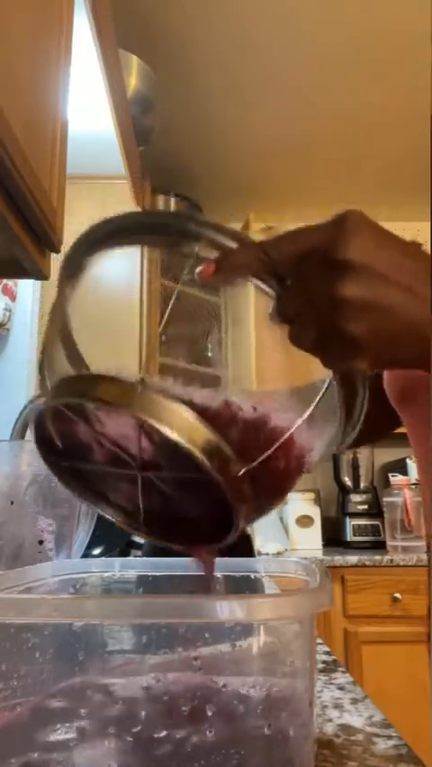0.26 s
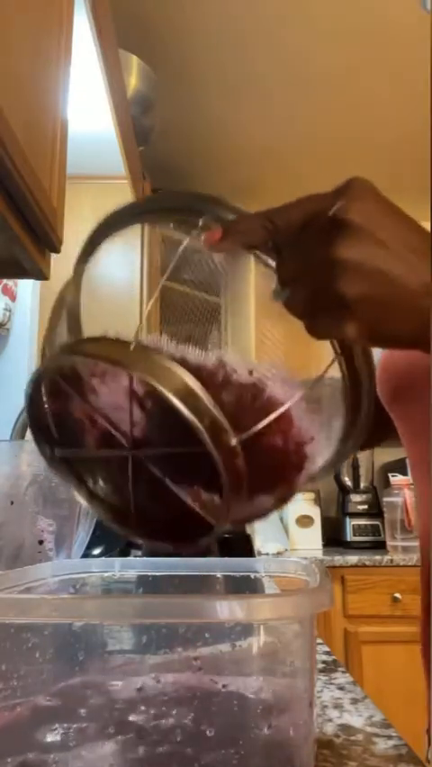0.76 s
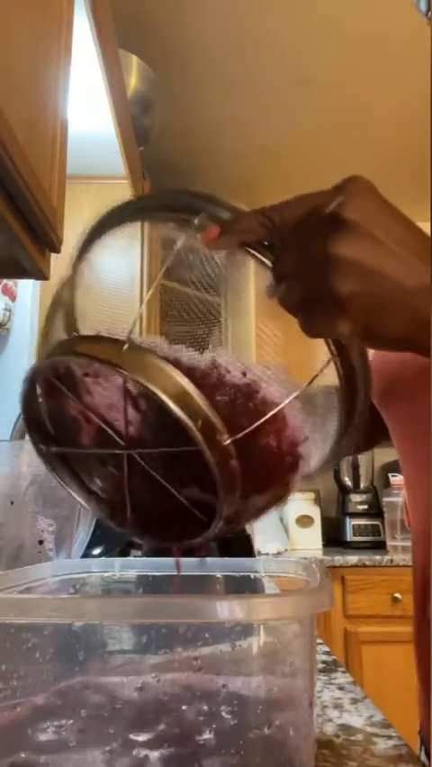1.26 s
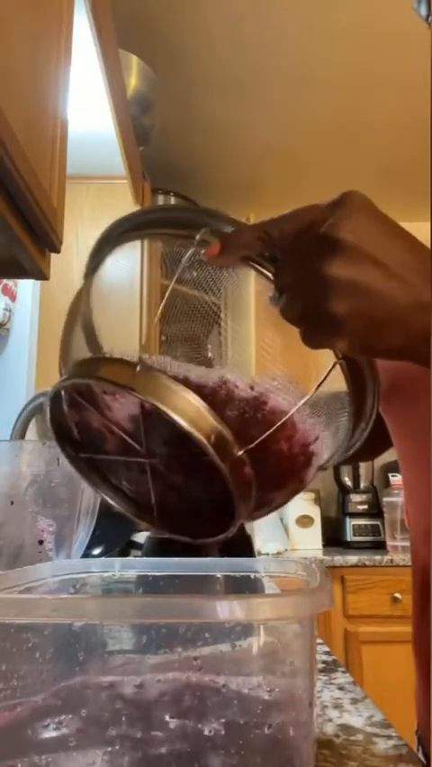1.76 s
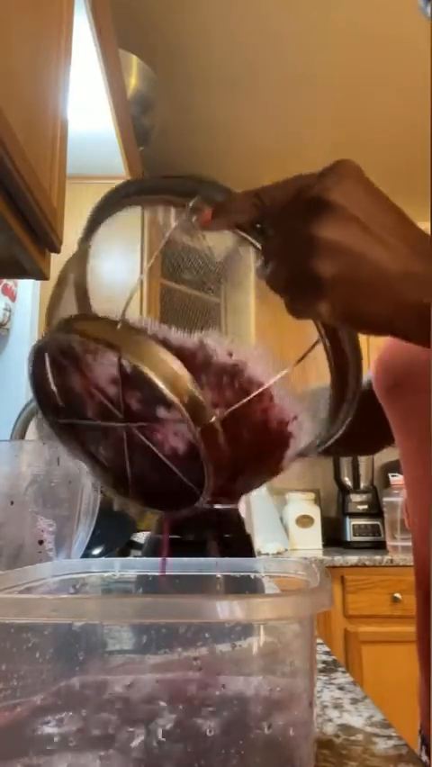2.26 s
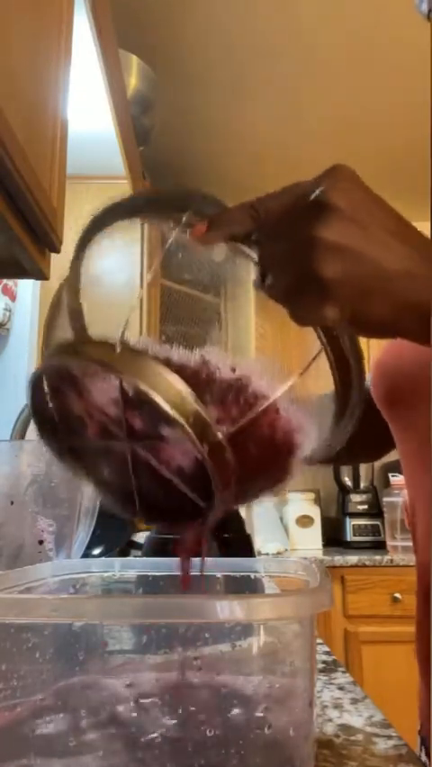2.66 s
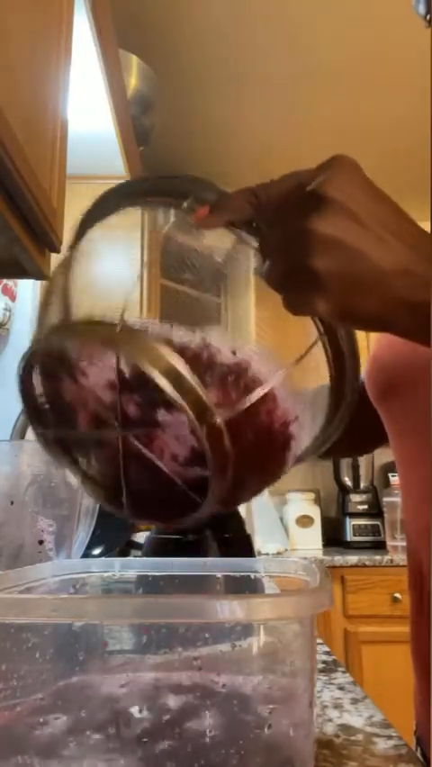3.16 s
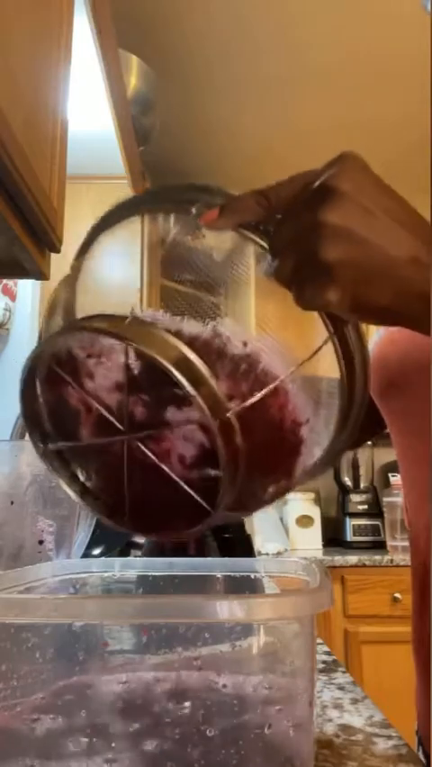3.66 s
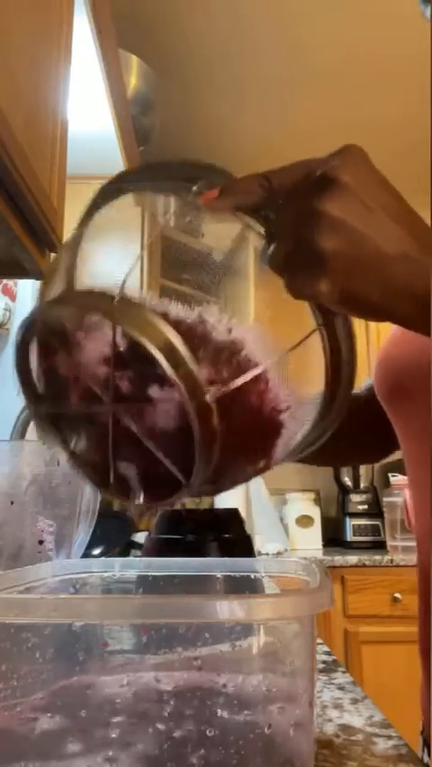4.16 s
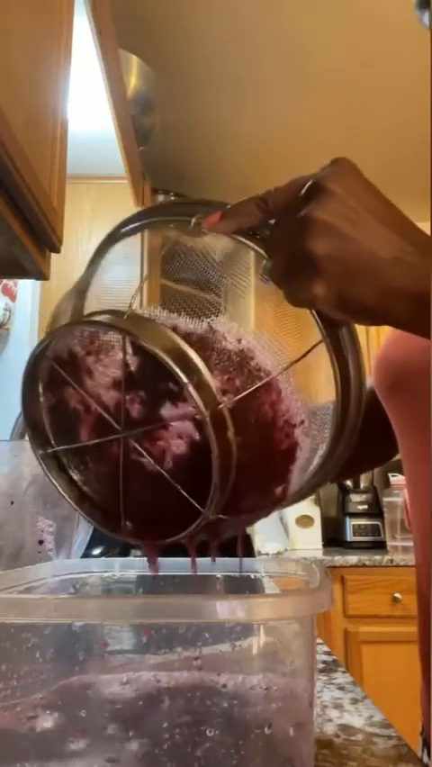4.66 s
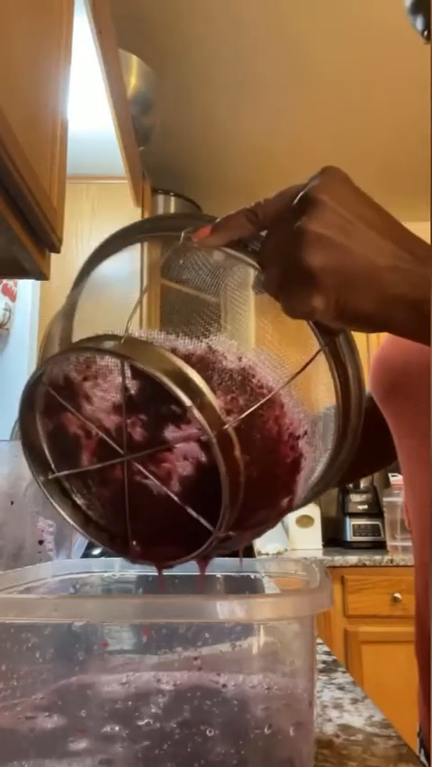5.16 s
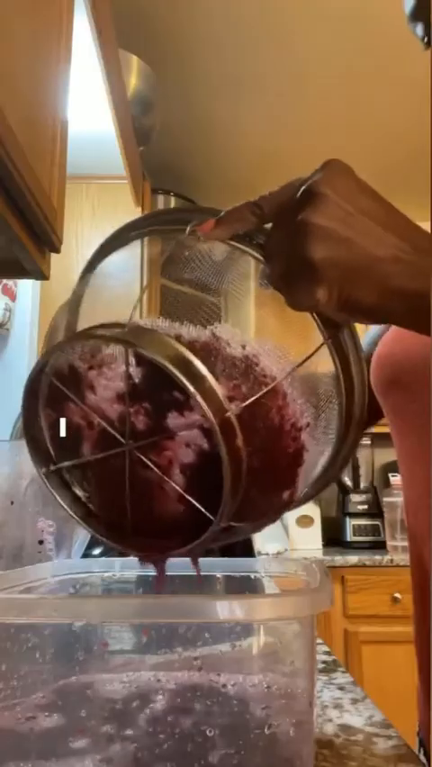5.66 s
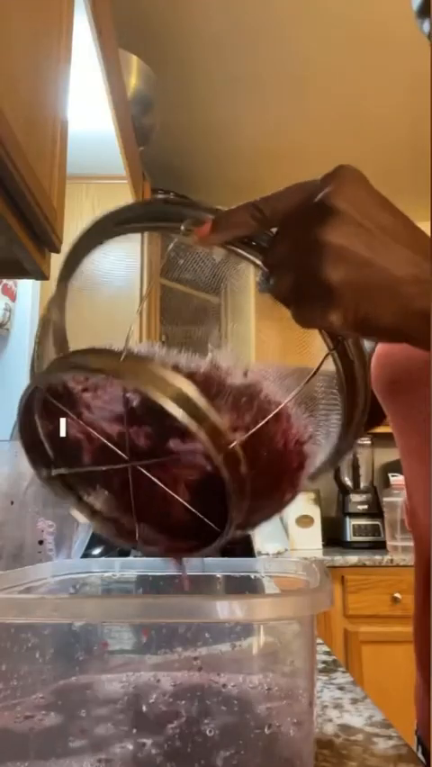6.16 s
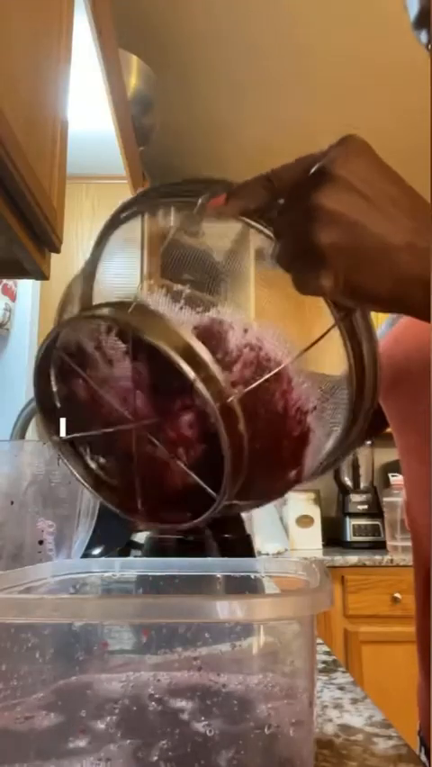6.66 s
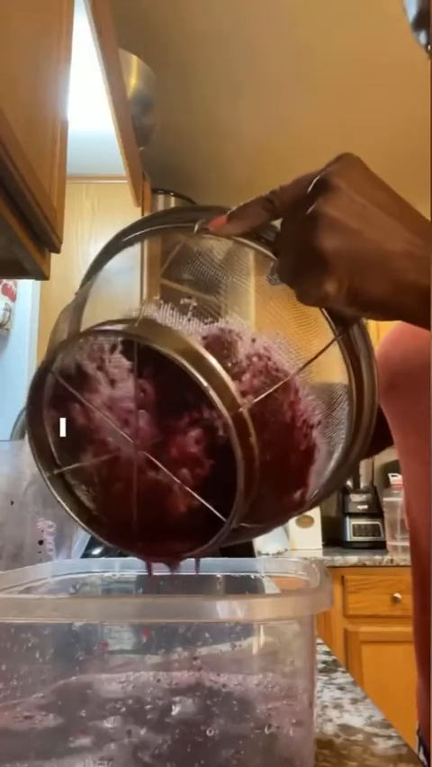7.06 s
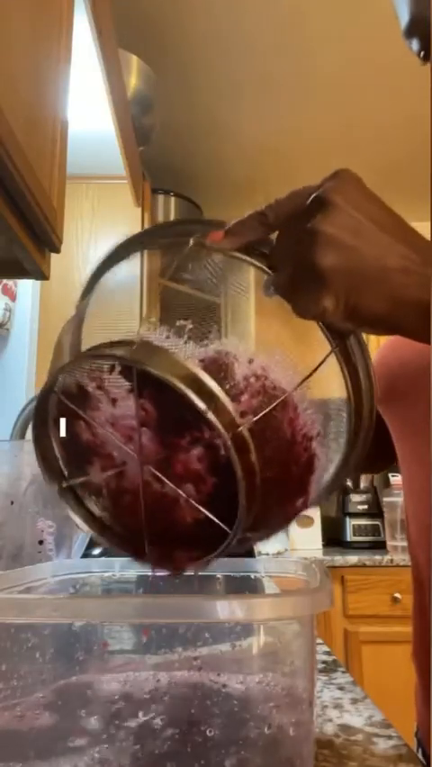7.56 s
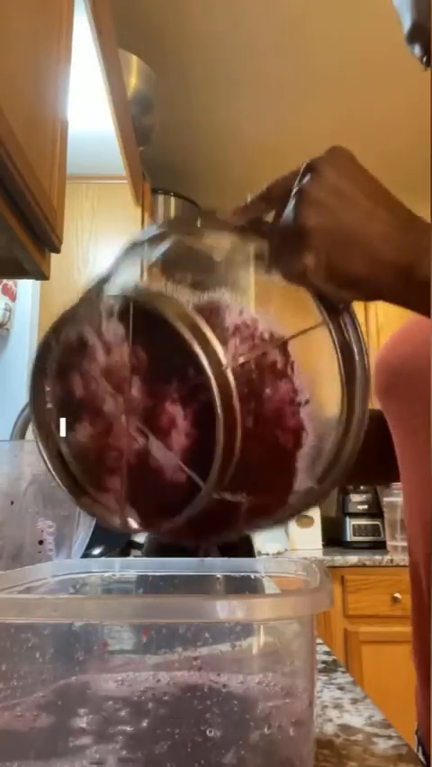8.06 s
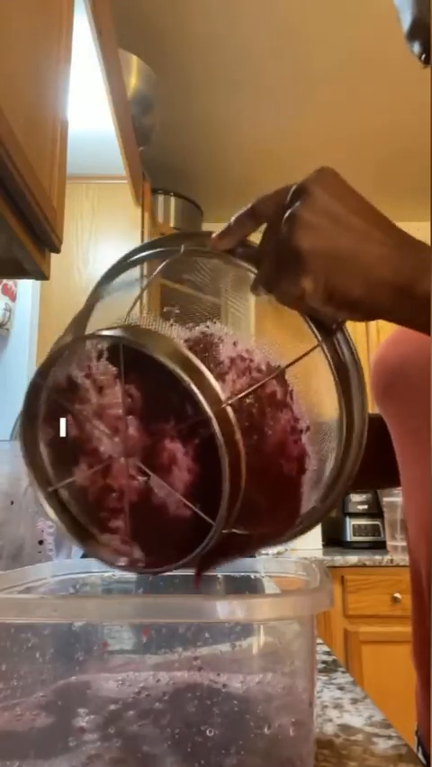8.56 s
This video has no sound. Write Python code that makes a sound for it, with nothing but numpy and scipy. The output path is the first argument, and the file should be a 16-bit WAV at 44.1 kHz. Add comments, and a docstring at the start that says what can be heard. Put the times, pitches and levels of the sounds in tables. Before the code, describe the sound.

From the start, dense wet squeezing of fruit pulp through a wire strainer, heard close: sticky crackle, tiny bubbles, bright spray and pitched pops in quick clusters until about 1.7 s. Activity thins, then bursts again around 2.0-2.7 s, with dull juice thuds in the plastic tub. After a quieter gap, a strong plop and thud come at 3.3 s, followed by sharp, bright snaps near 3.8 s and busy popping from 4.1 to 5.3 s, loudest near 4.9 s. Sound drops out completely at 5.3-5.6 s, returns muffled, and regains its treble around 5.8 s. Juicy pops and thuds crowd 5.9-6.4 s, thin out, then cluster at 7.0-7.3 s. A hissy, spraying squeeze stands out at 7.8-8.0 s; scattered squelches and pops continue to 8.7 s. Throughout, low arm rumble, faint hum, still air and slight kitchen echo.

```python
"""Pressing fruit pulp through a strainer

Hands press fruit pulp through a wire strainer over a plastic tub in a kitchen. Squeezes swell as
crackling noise and small bubbles; air pockets pop as bending notes with plops and spray; pitched blips
snap, ticks click and juice thuds on the tub floor. The tub's resonances colour squelch, pops and blips,
and the kitchen echoes it all, over arm rumble, room air and a hum. One dropout returns dull at first."""
import sys
import numpy as np
from scipy import signal
from scipy.fft import rfft, irfft, next_fast_len
from scipy.io import wavfile

SR = 44100
rng = np.random.default_rng(int(sys.argv[2]) if len(sys.argv) > 2 else 0)


def generate_wav(sig):
    """Save sig (samples, or channels by samples) to the path in sys.argv[1] as 16-bit PCM at SR."""
    pcm = np.round(np.clip(np.atleast_2d(sig).T, -1, 1) * 32767).astype(np.int16)
    wavfile.write(sys.argv[1], SR, pcm)


N = 388521  # length in samples

# Spectra, each shaped before its layer is levelled: pitch_hz, density_db (relative, per Hz)
# the room's still air
AIR_SPECTRUM = [(88, -31.5), (150, -9.5), (205, 1), (941, -4), (1560, -8), (5570, -7), (11900, -16.5),
                (14800, -3), (16000, -21)]
# low rumble of the working arms
RUMBLE_SPECTRUM = [(15, -29.5), (25, -23), (52, 5), (102, 8.5), (134, 3.5), (178, -14), (270, -18.5),
                   (350, -40), (590, -120)]
# wet body of the squeezed pulp
SQUELCH_SPECTRUM = [(88, -59.5), (150, -4), (440, 2), (640, 0), (1550, -8), (5000, -10), (6500, -39.5),
                    (11000, -120)]
# hiss of juice through the mesh
HISS_SPECTRUM = [(1650, -16.5), (2800, -8), (7700, -10), (8890, -22.5), (10000, -7.5), (13000, -42),
                 (22000, -120)]
# thin top of the hiss
MIST_SPECTRUM = [(4710, -36), (8000, 3), (12100, -13.5), (14100, -5), (16500, -0.5)]
# resonances of the air in the tub: pitch_hz, width_hz, level_db (relative; each use adds a boost)
TUB_RESONANCES = [(651.5, 43, 16.5), (1123, 57, 8.5), (1568, 61, 16.5), (2040, 280, 11.5), (2810, 77, 16),
                  (3620, 310, 6.5), (5490, 1570, 8.5)]
# squeezes of the pulp: start_s, hold_s, squelch_db, hiss_db, mist_db, rumble_db
SQUEEZES = [(0.085, 0.16, -50, -44.5, -53, -47.5), (0.344, 0.029, -58, -51.5, -54, -58),
            (0.475, 0.072, -53.5, -74, -63, -63), (0.72, 0.026, -64, -80, -69, -54.5),
            (0.923, 0.072, -48.5, -48, -57, -50.5), (1.077, 0.19, -58, -58, -72, -58),
            (1.318, 0.12, -55.5, -56.5, -66, -57), (1.478, 0.014, -46, -49, -73, -51),
            (1.603, 0.048, -53.5, -47, -63, -78), (1.995, 0.13, -63, -51, -57, -58.5),
            (2.29, 0.14, -57, -57, -56, -49), (2.459, 0.22, -50, -50, -59, -52.5),
            (2.88, 0.0084, -73, -44, -53.5, -64), (3.323, 0.06, -52, -53.5, -76, -55.5),
            (3.764, 0.18, -53, -48.5, -64, -49), (4.11, 0.046, -55, -45.5, -56.5, -66),
            (4.26, 0.03, -55, -76, -74, -65), (4.456, 0.048, -57, -56, -71, -51.5),
            (4.61, 0.21, -52, -69, -58.5, -54), (4.923, 0.029, -48, -46.5, -70, -54),
            (5.037, 0.049, -54.5, -76, -64, -52.5), (5.175, 0.078, -63.5, -75, -80.5, -55.5),
            (5.583, 0.37, -64.5, -82, -80, -59.5), (5.774, 0.067, -52, -71, -58, -67),
            (5.967, 0.025, -52.5, -66, -57.5, -65), (6.06, 0.033, -50.5, -47, -61, -50.5),
            (6.253, 0.031, -58.5, -48, -59, -52.5), (6.376, 0.12, -56, -61, -60.5, -69),
            (6.98, 0.033, -52.5, -70, -52, -52.5), (7.098, 0.21, -57, -81, -74, -60),
            (7.652, 0.039, -58.5, -84, -78, -59.5), (7.78, 0.04, -48.5, -38.5, -52, -61),
            (7.92, 0.027, -57.5, -45, -49, -75), (8.262, 0.27, -58, -78, -62.5, -55),
            (8.695, 0.2, -58.5, -58, -59, -57.5)]
# how fast a squeeze ebbs, one value each: squelch, hiss, mist, rumble (dB per s)
RELEASE_DB_PER_S = [96, 160, 120, 58]
# what seeps on between squeezes, one value each: squelch, hiss, mist, rumble (dB)
REST_DB = [-72.5, -67, -77.5, -63.5]
# lumps of juice landing on the tub floor: start_s, level_db
THUDS = [(0.705, -49.5), (0.748, -49), (0.77, -45), (0.923, -43), (1.458, -41.5), (1.509, -39),
         (2.346, -42), (2.421, -40.5), (2.498, -45), (3.336, -36), (5.996, -43.5), (6.109, -38.5),
         (6.303, -40), (7.006, -43.5), (7.168, -52), (7.795, -45), (8.713, -42.5)]
# short pitched blips with a snap: start_s, level_db, pitch_hz
BLIPS = [(0.074, -36, 8100), (0.213, -33, 2810), (0.258, -34, 2300), (0.38, -44, 5950), (0.6848, -45, 5840),
         (0.825, -44, 5460), (0.8618, -38, 3780), (0.885, -44.5, 1980), (0.905, -31.5, 4800),
         (1.089, -37, 3440), (1.133, -33, 3910), (1.155, -35.5, 3880), (1.209, -36.5, 810),
         (1.3897, -43, 2040), (1.4875, -40.5, 5550), (1.5983, -29, 3580), (1.644, -32, 2400),
         (1.7414, -44, 2110), (1.8118, -44.5, 2860), (1.9628, -36.5, 3270), (2.387, -36.5, 1180),
         (2.55, -33, 2830), (2.57, -35, 4050), (2.609, -36, 3210), (2.899, -36.5, 1746), (3.157, -51, 4000),
         (3.189, -49, 4950), (3.271, -42, 9700), (3.2962, -32, 5080), (3.422, -32, 5030),
         (3.5164, -44, 5840), (3.5409, -45, 2200), (3.6248, -46, 2530), (3.6573, -45, 1510),
         (3.797, -25, 3240), (3.8152, -23, 4160), (3.863, -21, 5530), (4.246, -37.5, 3400),
         (4.3305, -38, 3080), (4.492, -27, 3470), (4.5762, -32.5, 5970), (4.61, -36.5, 2200),
         (4.67, -33, 1497), (4.703, -34, 1180), (4.9352, -29.5, 2890), (4.945, -24, 3500),
         (5.094, -34, 1260), (5.2575, -37, 5870), (5.682, -31, 3300), (5.9473, -36, 1960),
         (5.975, -38.5, 2920), (6.053, -39, 2040), (6.2507, -38.5, 4280), (6.3969, -41, 765),
         (6.742, -49.5, 2480), (6.768, -47, 5300), (6.8089, -49, 1590), (6.9077, -38, 2630),
         (6.94, -44, 3750), (6.987, -44, 3600), (7.003, -40, 3720), (7.022, -39, 3830), (7.1091, -39, 2100),
         (7.149, -46, 5400), (7.407, -40.5, 2800), (7.4637, -30, 2280), (7.831, -29.5, 6260),
         (7.936, -33, 4110), (8.111, -51, 5030), (8.205, -36.5, 3430), (8.38, -45, 2350),
         (8.4276, -37, 1156), (8.556, -41, 2540)]
# air pockets with plop and spray:
# start_s, bubble_db, pitch_hz, plop_db, spray_db, roughness (0 clean to 1 torn)
POPS = [(0.1079, -31.5, 1140, -35.5, -45, 0), (0.1411, -22.5, 3620, -34, -52, 0.3),
        (0.166, -28, 624, -33, -48, 0.14), (0.196, -26.5, 3200, -39, -35, 0.56),
        (0.28, -33, 2900, -65, -29, 0.08), (0.3289, -20, 3406, -34, -35.5, 0.43),
        (0.4366, -39.5, 3700, -64, -36, 0.8), (0.5036, -27.5, 3530, -39, -30.5, 0.56),
        (0.532, -26, 2160, -35.5, -34, 0.42), (0.6185, -31.5, 4830, -47, -33, 0.42),
        (0.9193, -20, 1610, -29.5, -49, 0), (0.9767, -33, 5600, -44, -33, 0),
        (1.0009, -31.5, 1484, -30, -43, 0), (1.0261, -37.5, 653, -32, -58, 0.1),
        (1.077, -22.5, 2300, -44, -51, 0.39), (1.1184, -26.5, 3160, -63, -36.5, 0.3),
        (1.191, -30.5, 2920, -36.5, -30, 0.05), (1.305, -27.5, 2026, -40, -35, 0.54),
        (1.509, -30, 662, -31.5, -43, 0.05), (1.537, -28.5, 1200, -36.5, -50, 0.57),
        (1.558, -22, 2216, -50, -41, 0.6), (1.6132, -29.5, 1570, -67, -25, 0.47),
        (1.628, -28.5, 3850, -55, -37, 0.73), (1.6744, -23.5, 2634, -37.5, -49, 0.43),
        (2.0254, -37, 620, -36, -26, 0.2), (2.1238, -25.5, 2615, -39, -48, 0.92),
        (2.343, -30, 1190, -29.5, -43, 0.1), (2.4216, -25, 665, -28.5, -58, 0.26),
        (2.4878, -25.5, 4780, -42, -29, 0.64), (2.523, -36, 650, -40, -27.5, 0.4),
        (2.5404, -24, 2810, -42.5, -35, 0.42), (2.5656, -31, 610, -34, -31.5, 0),
        (2.6634, -26, 2280, -37.5, -40.5, 0.46), (2.872, -39, 2394, -43.5, -33, 0),
        (3.335, -22, 1394, -24, -44, 0), (3.3724, -27, 1690, -46, -45, 0.6),
        (3.42, -28, 2900, -47, -44, 0.4), (3.764, -32, 924, -44, -48, 0.4),
        (3.7904, -28, 1310, -30, -35.5, 0), (3.842, -31, 702, -24.5, -56, 0.1),
        (3.8618, -44, 624, -25.5, -29, 0.1), (3.982, -34, 2040, -42.5, -46, 0.4),
        (4.0837, -21, 2040, -46, -39, 0.2), (4.1338, -24, 2390, -56, -38, 0.6),
        (4.2935, -32.5, 2044, -40.5, -45, 0.5), (4.484, -35, 4600, -55, -45, 0.3),
        (4.4906, -32.5, 594, -34.5, -30.5, 0.4), (4.5417, -25, 2310, -42, -54, 0.42),
        (4.6405, -29.5, 1190, -41, -32.5, 0.36), (4.7649, -29, 1950, -40, -35.5, 0.54),
        (4.806, -36.5, 687, -41, -31, 0), (4.9447, -17.5, 2040, -51, -33, 0.45),
        (5.0444, -23, 1326, -30.5, -42, 0.07), (5.1983, -48, 677, -33.5, -75, 0.15),
        (5.2207, -32, 1770, -43, -62, 0.4), (5.263, -39, 2750, -46.5, -34, 0.08),
        (5.609, -30.5, 1070, -34, -39, 0.73), (5.9768, -21, 1580, -40.5, -45, 0.32),
        (6.063, -28.5, 3980, -63, -50, 0.4), (6.108, -23.5, 980, -31, -67, 0.11),
        (6.1492, -19.5, 2200, -39, -60, 0.25), (6.2872, -19.5, 3656, -38, -29, 0.44),
        (6.5662, -39, 1572, -46, -33.5, 0.75), (7.002, -24.5, 10700, -60, -55.5, 0.9),
        (7.003, -30.5, 578, -36, -52, 0.4), (7.0702, -47, 596, -28.5, -43, 0),
        (7.1673, -21.5, 1073, -32.5, -47, 0.16), (7.197, -28.5, 3125, -51, -41, 0.44),
        (7.2332, -34, 1316, -47, -30.5, 0.6), (7.236, -33, 13650, -53, -60, 1),
        (7.2678, -33, 1926, -40.5, -43, 0.5), (7.641, -22.5, 1584, -37.5, -45, 0.21),
        (7.6788, -32.5, 3080, -41, -35, 0.05), (7.7956, -29.5, 1900, -38.5, -58, 0.9),
        (7.9329, -22, 5340, -45, -23.5, 0.75), (7.968, -31.5, 7650, -41.5, -29, 0.85),
        (8.2164, -23, 3017, -55, -40, 0.19), (8.274, -38.5, 677, -57.5, -30.5, 0.03),
        (8.2894, -30, 4570, -45, -37, 0.1), (8.497, -43, 574, -47, -44.5, 0.9),
        (8.6672, -23, 2313, -43, -66, 0.17)]

AIR_DB, HUM_HZ, HUM_DB = -59.5, 124.4, -63.5
KITCHEN_T60_S, KITCHEN_DB, WALL_CUT_HZ = 0.3, -25, 18000
SILENT_FROM_S, SILENT_TO_S, TREBLE_BACK_S = 5.314, 5.574, 5.805
DULL_HZ, CUTOFF_HZ = 9100, 15950  # stopband edges
ATTACK_S = 0.023
# the thud's end pitch and sag time, and the plop's, are varied per event
THUD_START_HZ, THUD_END_HZ, THUD_SAG_S, THUD_DIES_S = 650, 109, 0.0086, 0.019
PLOP_START_HZ, PLOP_END_HZ, PLOP_SAG_S, PLOP_DIES_S = 2300, 396.5, 0.00261, 0.0042
PLOP_GRIT = 0.81  # gain of the plop's noise
TICKS_PER_S, TICK_DB, TICK_LOW_HZ = 70, -57, 1000  # level of the smallest tick before filtering


def from_db(db):
    """Turn decibels into an amplitude factor."""
    return 10 ** (np.asarray(db) / 20)


def rms_one(x):
    """Scale a signal to an rms of 1."""
    return x / np.sqrt(np.mean(x ** 2) + 1e-20)


def band(x, low_hz, high_hz):
    """Keep the band between two frequencies."""
    return signal.sosfilt(signal.butter(2, [low_hz, high_hz], "band", fs=SR, output="sos"), x)


def drift(rate_hz):
    """Slow random wander of rms 1: noise through a double one-pole low-pass."""
    r = np.exp(-40 * np.pi * rate_hz / SR)  # runs at a twentieth of the sample rate
    noise = rng.standard_normal(N // 20 + 2002)
    slow = signal.lfilter([1], [1, -2 * r, r * r], noise)[2000:]
    return np.interp(np.arange(N) / 20, np.arange(len(slow)), rms_one(slow))


def coloured(source, spectrum, patchy_db):
    """Shape two sources, in alternate bands of about half an octave that flicker apart; rms 1."""
    hz, db = np.transpose(spectrum)
    bands = round(2 * np.log2(hz[-1] / hz[0]))
    edges = np.geomspace(hz[0], hz[-1], bands + 1)
    out = 0
    for k, (low, high) in enumerate(zip(edges, edges[1:])):
        level_db = np.interp(np.log(low * high) / 2, np.log(hz), db)
        flicker = from_db(level_db + patchy_db * drift(11.6))
        out = out + flicker * band(source[k % 2], low, high)
    return rms_one(out)


def crackle(per_s, spread_db, clump_db, smear_s):
    """Two noises made of short bursts in the same clumps: sharp start, quick death."""
    sizes = from_db(spread_db * np.minimum(rng.exponential(1, N), 3))
    born = rng.random(N) < per_s * from_db(clump_db * drift(14)) / SR
    floor = 0.0058  # keeps a faint noise between bursts
    bursts = signal.lfilter([1], [1, -np.exp(-1 / (smear_s * SR))], sizes * born + floor)
    return bursts * rng.standard_normal((2, N))


def room_air():
    """The room's still air: shaped noise whose bands flicker slightly."""
    return from_db(AIR_DB) * coloured(rng.standard_normal((2, N)), AIR_SPECTRUM, patchy_db=2.5)


def hum():
    """A steady low sine whose level wavers a little."""
    t = np.arange(N) / SR
    return from_db(HUM_DB + 0.54 * drift(6.1)) * np.sin(2 * np.pi * HUM_HZ * t)


def kitchen(x):
    """Sixteen feedback delays, duller on every round, summed in the frequency domain."""
    size = next_fast_len(N + SR // 2)
    hz = np.arange(size // 2 + 1) * SR / size
    dull = 1 / (1 + 1j * hz / WALL_CUT_HZ)
    tail = 0
    for k, lag_s in enumerate(rng.uniform(0.012, 0.037, size=16)):
        loss = from_db(-60 * lag_s / KITCHEN_T60_S)
        loop = loss * np.exp(-2j * np.pi * hz * lag_s) * dull
        tail = tail + (-1) ** k * loop / (1 - loop)
    return irfft(rfft(x, size) * tail, size)[:N]


def tub(x, boost_db):
    """The tub's air rings at its own resonances when excited; the overall level is kept."""
    out = x.copy()
    for hz, width_hz, db in TUB_RESONANCES:
        r = np.exp(-np.pi * width_hz / SR)
        poles = [1, -2 * r * np.cos(2 * np.pi * hz / SR), r * r]
        peak = signal.lfilter([(1 - r * r) / 2, 0, (r * r - 1) / 2], poles, x)
        out += from_db(boost_db + db) * peak
    return rms_one(out) * np.std(x)


def effort():
    """Gains of squelch, hiss, mist and rumble: squeezes swell, hold and ebb over a resting level."""
    t = np.arange(0, N + 64, 64) / SR
    power = from_db(REST_DB)[:, None] ** 2 * np.ones(len(t))
    for start_s, hold_s, *levels_db in SQUEEZES:
        swell = np.clip((t - start_s) / ATTACK_S, 0, 1) ** 2
        ebb_db = -np.outer(RELEASE_DB_PER_S, np.maximum(t - start_s - hold_s, 0))
        gain = swell * from_db(np.array(levels_db)[:, None] + ebb_db)
        power += gain ** 2
    return [np.interp(np.arange(N) / SR, t, gain) for gain in np.sqrt(power)]


def arm_rumble(working):
    """Low noise of the arms that rises with each squeeze."""
    return working * coloured(rng.standard_normal((2, N)), RUMBLE_SPECTRUM, patchy_db=2.0)


def thuds():
    """The soft plastic floor gives a dull note that slides down as it dies."""
    t = np.arange(round(0.1 * SR)) / SR
    out = np.zeros(N + len(t))
    varied = rng.uniform(0.667, 1.335, (len(THUDS), 2))
    for (start_s, db), (stretch, tuning) in zip(THUDS, varied):
        end_hz = THUD_END_HZ * tuning
        sag = np.exp(-t / (THUD_SAG_S * stretch))
        hz = end_hz + (THUD_START_HZ - THUD_END_HZ) * sag
        note = np.exp(-t / THUD_DIES_S) * np.sin(2 * np.pi * np.cumsum(hz) / SR)
        first = round(start_s * SR)
        out[first:first + len(t)] += from_db(db) * note
    return out[:N]


def ticks():
    """Lone droplets snap off the mesh: sparse, sharp clicks of uneven size."""
    sizes = from_db(TICK_DB + 5.6 * np.minimum(rng.exponential(1, N), 3))
    snaps = (rng.random(N) < TICKS_PER_S / SR) * sizes
    decays = signal.lfilter([1], [1, -np.exp(-1 / (0.00035 * SR))], snaps)
    return band(decays * rng.standard_normal(N), TICK_LOW_HZ, 11000)


def mesh_hiss(hissing, misting):
    """Juice forced through the mesh: fine crackle as a broad hiss plus a thin top."""
    fizz = crackle(900, spread_db=6.5, clump_db=4, smear_s=0.0012)
    hiss = hissing * coloured(fizz, HISS_SPECTRUM, patchy_db=2.5)
    return hiss + misting * coloured(fizz, MIST_SPECTRUM, patchy_db=1.5)


def blips(dies_s=0.0045, swell_s=0.0005, snap_db=-43, width=1.2, rasp_db=-6):
    """Each blip: a short pitched note frayed by a wet rasp, plus a broad snap alike for all blips."""
    t = np.arange(round(0.03 * SR)) / SR
    grit = rng.standard_normal(N + len(t))
    out = np.zeros(N + len(t))
    for (start_s, db, hz), (long, bend) in zip(BLIPS, rng.standard_normal((len(BLIPS), 2))):
        at = slice(round(start_s * SR), round(start_s * SR) + len(t))
        rasp = rms_one(band(grit[at], hz / width, hz * width))
        note = np.sin(2 * np.pi * hz * t * (1 + 2 * bend * t)) + from_db(rasp_db) * rasp
        body = (1 - np.exp(-t / swell_s)) * np.exp(-t / dies_s / from_db(1.5 * long))
        blip = note * body
        snap = grit[at] * np.exp(-t / swell_s)
        out[at] += from_db(db) * blip / np.abs(blip).max() + from_db(snap_db) * snap
    return out[:N]


def small_bubbles(per_s, cycles, spread_db):
    """Little pockets burst at random in 22 pitches; each note swells and dies over some cycles."""
    sizes = from_db(spread_db * np.minimum(rng.exponential(1, N), 4)) * rng.choice([-1, 1], N)
    born = rng.random(N) < per_s * from_db(5 * drift(12)) / SR
    dealt = rng.integers(0, 22, N)
    out = 0
    for k, hz in enumerate(np.geomspace(1200, 7000, 22)):
        r, w = from_db(-60 * hz / cycles / SR), 2 * np.pi * hz / SR
        ring = [0, np.sin(w), 0, 1, -2 * r * np.cos(w), r * r]
        bursts = sizes * born * (dealt == k) + 1e-18
        out = out + w * signal.sosfilt([ring, ring], bursts)  # two resonators make it swell
    return rms_one(out)


def pulp_squelch(squelching):
    """Squeezed pulp: coarse wet crackle and small bubbles under the same pressure."""
    smacks = crackle(450, spread_db=6.5, clump_db=2.5, smear_s=0.003)
    smacks = coloured(smacks, SQUELCH_SPECTRUM, patchy_db=2.5)
    plinks = small_bubbles(450, cycles=26.7, spread_db=2.5)
    return squelching * (smacks + plinks)


def pops(rise_s=0.0023, swell_s=0.0017, clean_s=0.0051, torn_s=0.0057, glide=0.011,
         echo_s=0.0085, echo_db=-17):
    """Each air pocket: a bending, ringing note, a plop that slides down and a tinted bright spray."""
    t = np.arange(round(0.06 * SR)) / SR
    plop, spray, grit = rng.standard_normal((3, N + len(t)))
    plop = rms_one(band(plop, 170, 1500))
    tints = np.array([band(spray, 2400, 5500), band(spray, 5340, 13000),
                      from_db(1.5) * band(spray, 12600, 15000)])
    out = np.zeros(N + len(t))
    chances = rng.standard_normal((len(POPS), 7))
    for (start_s, db, hz, plop_db, spray_db, rough), chance in zip(POPS, chances):
        at = slice(round(start_s * SR), round(start_s * SR) + len(t))
        slow, long = from_db(2.5 * chance[0]), from_db(1.5 * chance[1])
        bend, wobble = 0.012 * chance[2], 0.35 * chance[3]
        # the pocket holds its note, then closes quickly
        ringing = (1 - np.exp(-t / swell_s)) * np.exp(-(t / clean_s / long) ** 2)
        dying = (1 - np.exp(-t / rise_s / slow)) * np.exp(-t / torn_s / long)
        # the wet film tears as the pocket opens
        torn = rms_one(band(grit[at], hz * 0.82, min(hz * 1.41, 0.4 * SR)))
        bent = 1 + (glide + bend) * t / clean_s
        note = np.sin(2 * np.pi * hz * t * bent + wobble * torn)
        bubble = (1 - rough) * ringing * note + rough * dying * torn

        sag = np.exp(-t / PLOP_SAG_S / long)
        falling_hz = PLOP_END_HZ * long + (PLOP_START_HZ - PLOP_END_HZ) * sag
        slide_level = 2 * (1 - np.exp(-t / PLOP_SAG_S)) * np.exp(-t / PLOP_DIES_S)
        slide = slide_level * np.sin(2 * np.pi * np.cumsum(falling_hz) / SR)
        tinted = rms_one(from_db(2.5 * chance[4:]) @ tints[:, at])
        out[at] += from_db(db) * bubble + from_db(spray_db) * dying * tinted
        out[at] += from_db(plop_db) * (PLOP_GRIT * dying * plop[at] + slide)
    # sound bounces between juice and strainer
    feedback = np.zeros(round(echo_s * SR) + 1)
    feedback[0], feedback[-1] = 1, -from_db(echo_db)
    return signal.lfilter([1], feedback, out[:N])


def scene():
    """Pulp and juice sound through tub and kitchen, over arm rumble, room air and hum."""
    squelching, hissing, misting, working = effort()
    background = room_air() + hum() + arm_rumble(working)
    squelch = tub(pulp_squelch(squelching), boost_db=-19.5)
    bursts = tub(pops() + blips(), boost_db=-13.0)
    wet = squelch + bursts + mesh_hiss(hissing, misting) + thuds() + ticks()
    return (wet + from_db(KITCHEN_DB) * kitchen(wet) + background)[None]


def record(dry):
    """The sound drops out briefly and returns dull at first; the lowest bass and the top are cut."""
    t = np.arange(N) / SR
    dull = signal.sosfilt(signal.cheby2(20, 55, DULL_HZ, fs=SR, output="sos"), dry)
    treble_s = [SILENT_FROM_S, SILENT_TO_S, TREBLE_BACK_S - 0.002, TREBLE_BACK_S + 0.002]
    treble = np.interp(t, treble_s, [1, 0, 0, 1])
    fade_s = [SILENT_FROM_S - 0.002, SILENT_FROM_S + 0.003, SILENT_FROM_S + 0.028,
              SILENT_TO_S - 0.008, SILENT_TO_S - 0.004, SILENT_TO_S + 0.003]
    gain = from_db(np.interp(t, fade_s, [0, -18, -70, -70, -18, 0]))
    heard = gain * (treble * dry + (1 - treble) * dull)
    heard = signal.sosfilt(signal.butter(4, 32, "high", fs=SR, output="sos"), heard)
    return signal.sosfilt(signal.cheby2(24, 60, CUTOFF_HZ, fs=SR, output="sos"), heard)


dry = scene()
out = record(dry)
generate_wav(out)
```